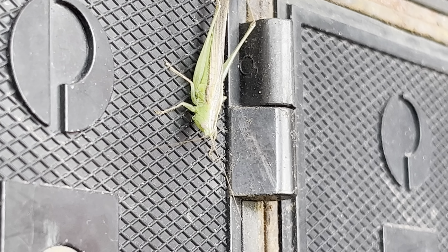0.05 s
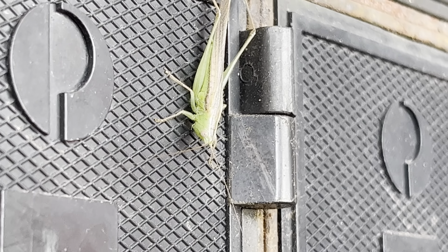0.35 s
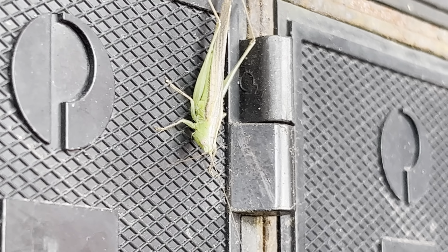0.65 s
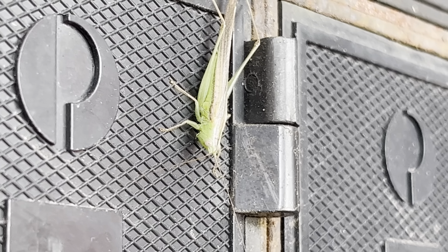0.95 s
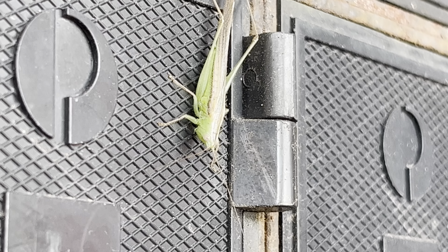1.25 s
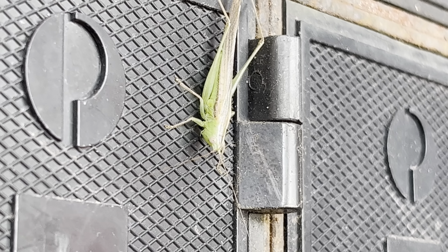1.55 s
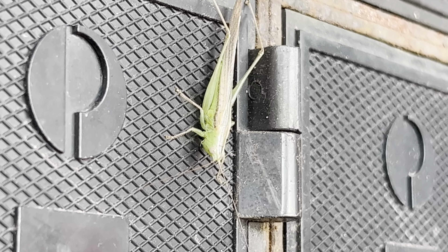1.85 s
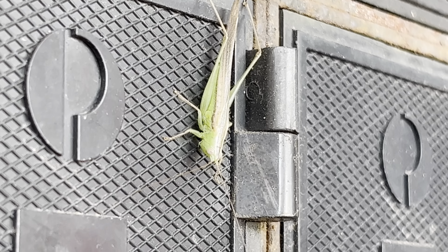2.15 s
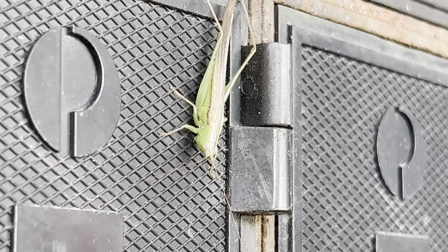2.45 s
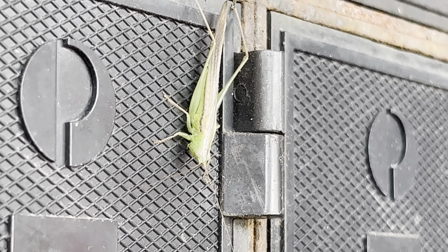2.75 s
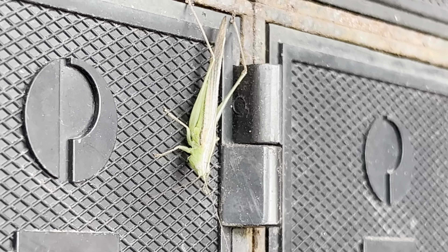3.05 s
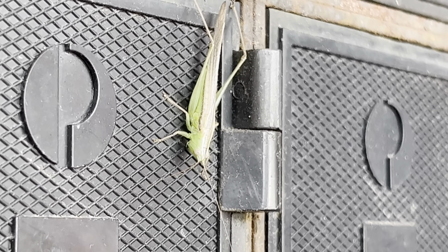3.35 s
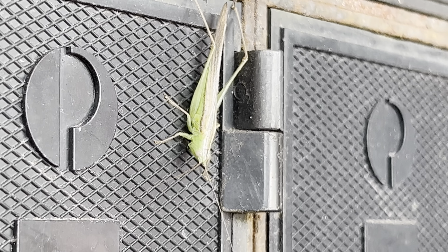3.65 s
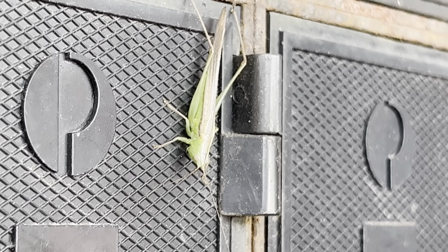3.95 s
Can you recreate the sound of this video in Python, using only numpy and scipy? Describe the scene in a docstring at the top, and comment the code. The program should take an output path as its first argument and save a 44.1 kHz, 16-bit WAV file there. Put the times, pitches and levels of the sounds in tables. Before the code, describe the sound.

Wind buffets the microphone with low rumble and thumps, over distant traffic and a faint cricket.

```python
"""Outdoors near a door. From the start, wind buffets a hand-held phone with rumble and thumps.
Behind it, distant traffic rushes and a bush cricket trills thinly, 25 wing strokes a second.
A far vehicle passes at 0.8 s; the wind drops after 2.2 s. Around 3 s a far engine drones,
sinking in pitch. Near the end a fainter vehicle passes, a last gust rises and a hum swells."""
import sys
import numpy as np
from scipy import signal
from scipy.fft import rfft, irfft
from scipy.io import wavfile
from scipy.ndimage import uniform_filter1d

SR = 44100
rng = np.random.default_rng(int(sys.argv[2]) if len(sys.argv) > 2 else 0)


def put_to_file(sound):
    """Save the sound as 16-bit audio at rate SR, in the file named by the first command-line argument."""
    columns = np.atleast_2d(sound).T  # one column per channel
    safe = np.clip(columns, -1, 1)
    whole_steps = np.round(safe * 32767)
    wavfile.write(sys.argv[1], SR, whole_steps.astype(np.int16))


N = 4 * SR
T = np.arange(N) / SR
FREQS = np.maximum(np.fft.rfftfreq(N, 1 / SR), 1)
OPPOSED = np.array([[1], [-1]])  # left +, right -


def undb(db):
    """Decibels to gain."""
    return 10 ** (np.asarray(db) / 20)


def unit(x):
    """Scale to rms 1."""
    return x / np.sqrt(np.mean(x ** 2))


def curve(rows, column=1):
    """One column of a time table at every sample."""
    rows = np.array(rows)
    return np.interp(T, rows[:, 0], rows[:, column])


def over_hz(rows, column=1):
    """One column of a frequency table at every bin."""
    rows = np.array(rows)
    return np.interp(np.log(FREQS), np.log(rows[:, 0]), rows[:, column])


def noise(gain):
    """Noise of rms 1, shaped by a gain per bin."""
    return unit(irfft(rfft(rng.standard_normal(N)) * gain, N))


def walk(rate_hz):
    """Smooth random drift, rms 1."""
    return noise(1 / (1 + (FREQS / rate_hz) ** 4))


def resonance(hz, width_hz):
    """Gain of a steep resonance at every bin."""
    return 1 / (1 + ((FREQS - hz) * 2 / width_hz) ** 2)


def swell(at_s, sigma_s):
    """Gaussian envelope, peak 1."""
    return np.exp(-.5 * ((T - at_s) / sigma_s) ** 2)


def traffic():
    """Wide, far tyre rush: octaves swell together, low ones flicker, single vehicles stand out."""
    # rush spectrum: f/Hz, relative density/dB
    rush_colour = [(20, -37), (60, -20), (120, 6), (220, 2.5), (310, 1), (400, 4.5), (520, 2.5),
                   (800, -1.5), (1150, -2), (1320, -4), (1550, -.7), (1900, -2.8), (2300, -10.5),
                   (2750, -15), (3300, -10.5), (3950, -17), (4600, -13.8), (5200, -17.5), (5800, -22),
                   (6800, -15.5), (9000, -13), (11500, -21)]
    # rush envelope: t/s, level/dB
    rush_level = [(0, -40), (.8, -40.5), (1.4, -41), (2.4, -41.5), (3.45, -41.5), (3.9, -39.5), (4, -39.5)]
    # stereo image: f/Hz, side minus mid/dB, left minus right/dB
    image = [(30, -24, 4), (70, -47, -5), (201, -16, 1), (403, -5, 2.5), (616, -2, 3), (1180, -4, -.5),
             (1770, -3.5, -1.1), (2290, -13.5, -2), (3480, -13, 1), (4760, -41, -0.5), (6300, -9, 0),
             (8330, -23, 0)]
    # passing vehicles: t/s, sigma/s, centre/Hz, width/Hz, level/dB
    passes = [(.82, 0.21, 1410, 1300, -47), (3.6, 0.45, 1700, 400, -57)]
    swell_db, flicker_db, flicker_corner_hz = 0.38, 0.67, 1700
    side_gain = undb(over_hz(image))
    pan = undb(OPPOSED * over_hz(image, column=2) / 2)
    mid, side = rfft(rng.standard_normal((2, N)))
    stereo = (mid + OPPOSED * side_gain * side) / np.hypot(1, side_gain)
    spectrum = stereo * pan * undb(over_hz(rush_colour))
    rush = 0
    for octave in range(4, 15):
        band = np.maximum(1 - abs(np.log2(FREQS) - octave), 0)
        depth_db = flicker_db * min(flicker_corner_hz / 2 ** octave, 1)
        rush += irfft(spectrum * band, N) * undb(depth_db * walk(11))
    rush = unit(rush) * undb(curve(rush_level) + swell_db * walk(1.5))
    for at_s, sigma_s, hz, width_hz, db in passes:
        tyres = np.array([noise(resonance(hz, width_hz)) for _ in range(2)])
        rush += tyres * undb(db) * swell(at_s, sigma_s)
    return rush


def engines():
    """One far engine sinks in pitch; then a wavering hum draws nearer."""
    # engine drone: t/s, f/Hz, level/dB
    drone_track = [(2.7, 92.1, -56), (2.92, 87.7, -43), (3.04, 82.4, -29), (3.23, 72.3, -31.5),
                   (3.38, 68.4, -39), (3.5, 67.6, -52)]
    # hum envelope: t/s, level/dB
    hum_level = [(0, -97), (3.5, -61), (3.75, -50), (3.9, -39), (4, -46.5)]
    # hum partials: f/Hz, relative level/dB
    hum_tones = [(166, 3.5), (222, -6.5), (382, -6)]

    def tone(hz):
        wavering_hz = hz * (1 + 0.01165 * walk(11.4))
        return np.sqrt(2) * np.sin(2 * np.pi * np.cumsum(wavering_hz) / SR)

    drone = tone(curve(drone_track)) * undb(curve(drone_track, column=2))
    hum = sum(tone(hz) * undb(db + 3.1 * walk(6.6)) for hz, db in hum_tones)
    return drone + hum * undb(curve(hum_level))


def cricket():
    """Regular wing strokes rasp into high resonances, with one brighter band that drifts."""
    # wing resonances: f/Hz, width/Hz, relative level/dB
    modes = [(7540, 90, -13), (8000, 80, -18), (8510, 320, -3), (8800, 60, -12), (8940, 50, -17),
             (9100, 60, -7.5), (9360, 1200, -1.5), (10000, 76, -17), (10230, 160, -12)]
    # trill envelope: t/s, level/dB
    trill_level = [(0, -58.5), (.6, -54.5), (1.1, -52.5), (1.85, -58), (2.25, -53.5), (2.7, -62),
                   (3.2, -54.5), (3.6, -58), (4, -67)]
    # bright band: t/s, centre/Hz, level/dB
    shimmer_track = [(0, 10030, -62), (.45, 10160, -65), (.82, 10160, -55), (1.3, 10100, -67),
                     (1.55, 10100, -56.5), (1.85, 10020, -67), (2.12, 10130, -53.5), (2.5, 9650, -64),
                     (2.72, 9650, -71), (2.9, 9560, -59.5), (3.15, 9380, -52.5), (3.42, 9270, -58.5),
                     (3.65, 9300, -61), (4, 9400, -71)]
    stroke_hz, stroke_at_s, stroke_floor = 25.45, 0.038, 0.8
    scatter_db, wander_db = 0.3, 2
    cycles = (T - stroke_at_s) * stroke_hz + 0.051 * walk(3.4)
    strokes = stroke_floor + abs(np.cos(np.pi * cycles)) ** 0.6
    strokes = unit(strokes * undb(-scatter_db * walk(16)))
    wing = unit(sum(undb(db + wander_db * walk(0.64)) * noise(resonance(hz, width_hz))
                    for hz, width_hz, db in modes))
    phase = 2 * np.pi * np.cumsum(curve(shimmer_track)) / SR
    rasp = resonance(0, width_hz=390)
    shimmer = unit(noise(rasp) * np.cos(phase) + noise(rasp) * np.sin(phase))
    return strokes * (wing * undb(curve(trill_level)) + shimmer * undb(curve(shimmer_track, column=2)))


def door_reflections(x):
    """Nearby surfaces leave a fine, static ripple in the spectrum, weaker in the bass."""
    depth_db, spacing_hz, corner_hz = 2.33, 54.65, 700
    grid_hz = np.arange(0, SR / 2, spacing_hz)
    ripple = np.interp(FREQS, grid_hz, rng.standard_normal(N)[:len(grid_hz)])
    return irfft(rfft(x) * undb(depth_db * ripple * FREQS / (FREQS + corner_hz)), N)


def thumps():
    """Each eddy pushes and pulls the diaphragm once."""
    # single eddies: t/s, level before windowing/dB, f/Hz
    eddies = [(.075, -20.5, 161), (0.544, -17.5, 128), (.763, -19.5, 200), (.79, -14, 68),
              (.842, -16.5, 89), (0.903, -10, 102), (0.916, -20, 246), (0.989, -14, 146), (1.06, -15, 171),
              (1.161, -15, 134), (1.2, -17, 100), (1.708, -20, 100), (2.208, -19, 85)]
    sigma_cycles = 0.42
    return sum(-undb(db) * np.sin(2 * np.pi * hz * (T - at_s)) * swell(at_s, sigma_cycles / hz)
               for at_s, db, hz in eddies)


def steady(x, window_s=0.054):
    """Hold the running rms near 1."""
    return x / np.sqrt(uniform_filter1d(x ** 2, int(window_s * SR)))


def wind():
    """Gusts on the microphone: rumble, deep heaves, ragged flutter and thumps; nearly mono."""
    # rumble envelope: t/s, relative level/dB
    gusts = [(0, -32.5), (.1, -22.5), (.17, -32.5), (.25, -21.5), (.33, -32.5), (.39, -23.5), (.48, -26.5),
             (.55, -20), (.68, -30), (.73, -21), (.87, -30.5), (.94, -21), (1.03, -25), (1.1, -21.5),
             (1.27, -27.5), (1.33, -22), (1.42, -25), (1.5, -28), (1.74, -18.5), (1.82, -28), (1.96, -22),
             (2.07, -27), (2.17, -30), (2.21, -26), (2.26, -33), (2.6, -32.5), (2.85, -36.5), (3.15, -35.5),
             (3.4, -36), (3.8, -28), (4, -34)]
    # rumble spectrum: f/Hz, relative density/dB
    rumble_colour = [(12, -44), (25, -33), (36, -8), (48, -4.5), (65, 4.5), (85, -3.5), (115, -8),
                     (160, -22.5), (300, -52), (1500, -110)]
    # flutter envelope: t/s, relative level/dB
    flutter_level = [(0, -46), (.5, -41.5), (.7, -41.5), (.95, -39.5), (1.15, -35.5), (1.3, -44),
                     (1.7, -42), (2.15, -42), (2.35, -47), (2.7, -43.5), (3.4, -45), (3.9, -42), (4, -40.5)]
    # flutter spectrum: f/Hz, relative density/dB
    flutter_colour = [(60, -41), (100, -0.5), (150, -2), (215, -2), (280, -10.5), (380, -19), (700, -49),
                      (2500, -100)]
    # large, slow eddies: t/s, sigma/s, level/dB
    heaves = [(0.255, 0.21, -29.5), (1.36, 0.069, -23), (1.633, 0.043, -26.5), (1.96, 0.055, -26)]
    rumble_gain_db, rumble_side_db = -0.4, -21
    flutter_gain_db, flutter_side_db, pan_db = 5.5, -13.5, 2.5
    eddy_db, eddy_hz = 1.35, 22
    low, upper = undb(over_hz(rumble_colour)), undb(over_hz(flutter_colour))
    rumble = steady(noise(low)) + OPPOSED * undb(rumble_side_db) * noise(low * FREQS)
    rumble *= undb(curve(gusts) + rumble_gain_db)
    flutter = noise(upper) + OPPOSED * undb(flutter_side_db) * noise(upper)
    flutter *= unit(undb(eddy_db * walk(eddy_hz)))
    flutter *= undb(curve(flutter_level) + flutter_gain_db)
    heave = steady(noise(resonance(hz=49.1, width_hz=14)))
    heave *= sum(undb(db) * swell(at_s, sigma_s) for at_s, sigma_s, db in heaves)
    return rumble + heave + (flutter + thumps()) * undb(OPPOSED * pan_db / 2)


def scene():
    """Wind in front; engines, traffic and cricket behind."""
    return wind() + engines() + door_reflections(traffic() + cricket())


def record(dry):
    """The phone's two ports differ in treble phase; it dulls the top, then cuts it steeply."""
    # microphone response: f/Hz, gain/dB
    microphone = [(6500, 1), (10300, 0.5), (10800, 1.5), (11300, -4), (12000, -12.5)]
    # left port's lag behind the right: f/Hz, phase/rad
    port_lag = [(1100, 0), (1800, 1.88), (2150, 0.56), (3300, 0), (3900, -0.13), (5250, 0), (5750, 1.8),
                (6700, 2.5), (7000, 4), (7350, 5), (8850, 5), (9550, 6.35), (11100, 8.5)]
    cutoff_hz, half_taps = 11700, 128
    ports = np.exp(1j * np.array([[-1], [0]]) * over_hz(port_lag))
    impulse = irfft(ports * undb(over_hz(microphone)), N)
    fir = np.roll(impulse, half_taps, axis=1)[:, :2 * half_taps + 1]
    padded = np.pad(dry, ((0, 0), (half_taps, half_taps)), mode="reflect", reflect_type="odd")
    heard = signal.fftconvolve(padded, fir, mode="valid", axes=1)
    return signal.sosfilt(signal.ellip(8, .2, 70, cutoff_hz, fs=SR, output="sos"), heard)


dry = scene()
out = record(dry)
put_to_file(out)
```